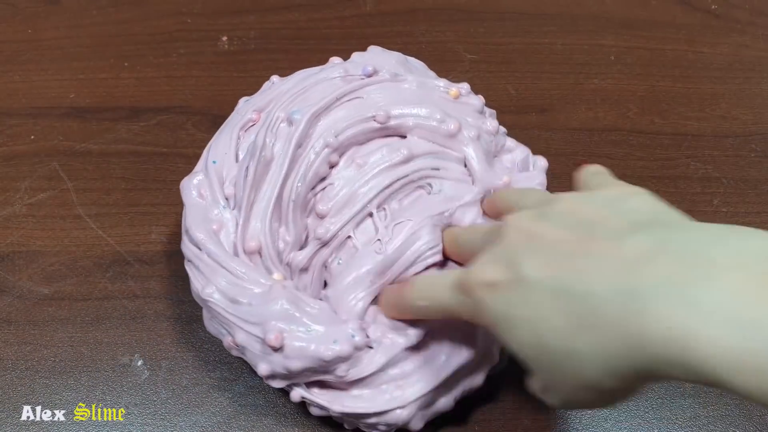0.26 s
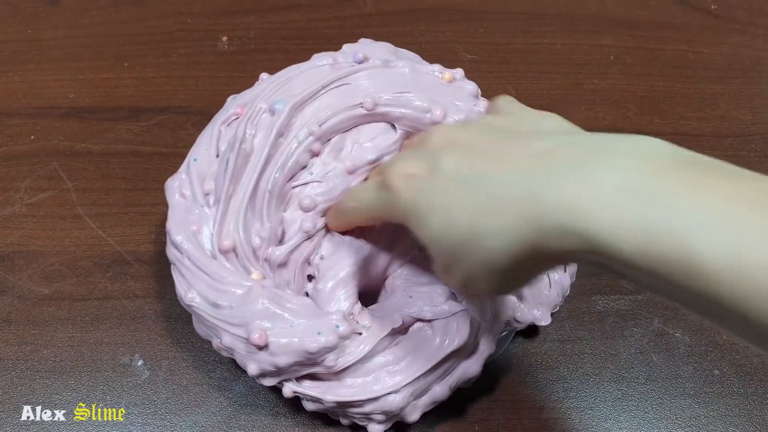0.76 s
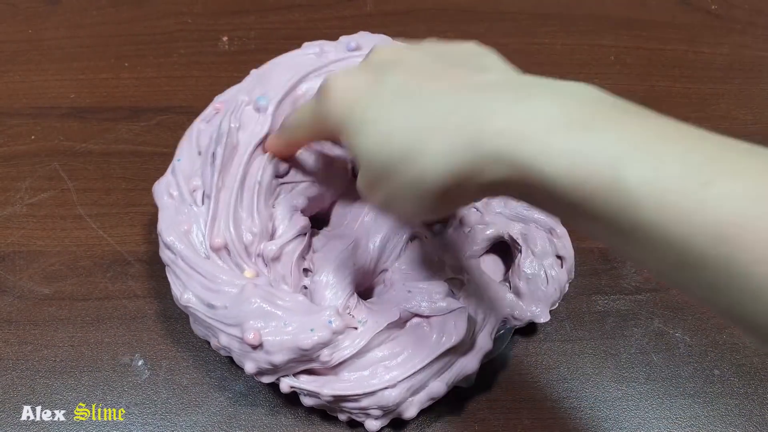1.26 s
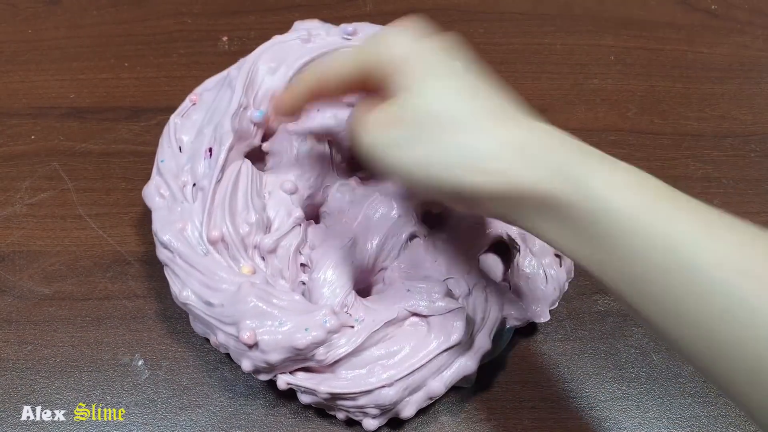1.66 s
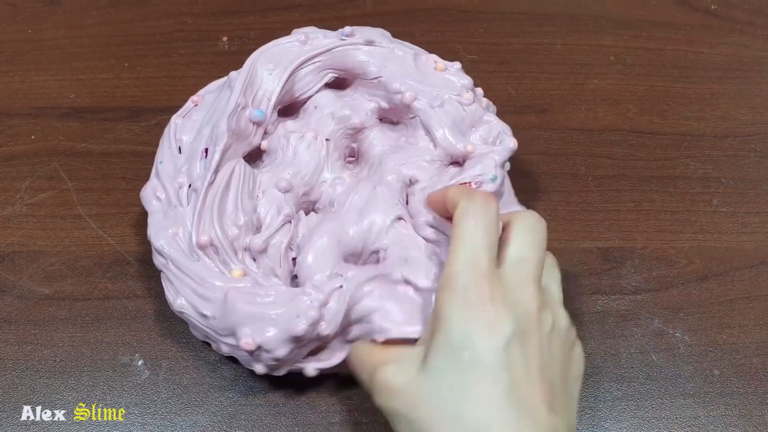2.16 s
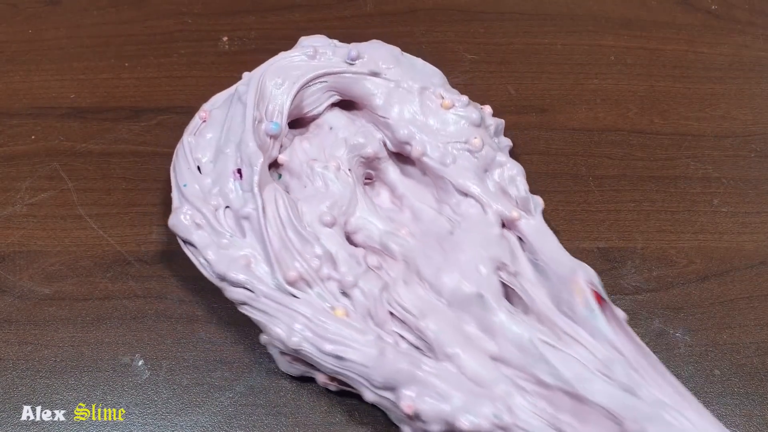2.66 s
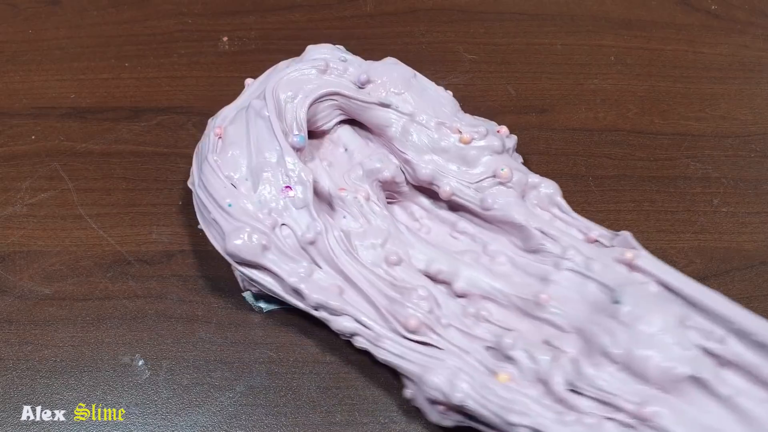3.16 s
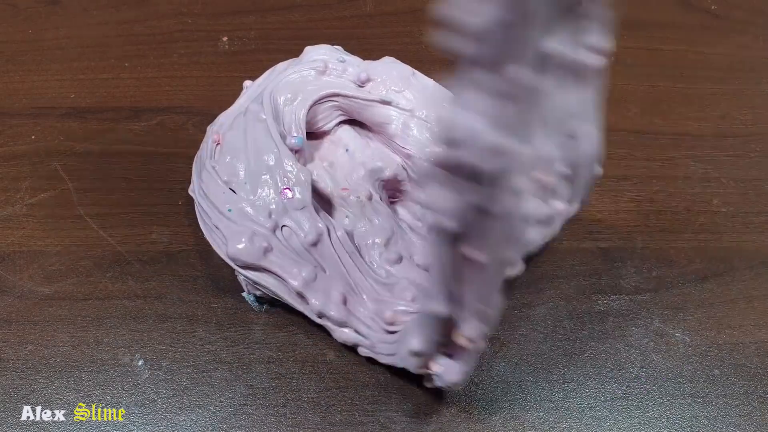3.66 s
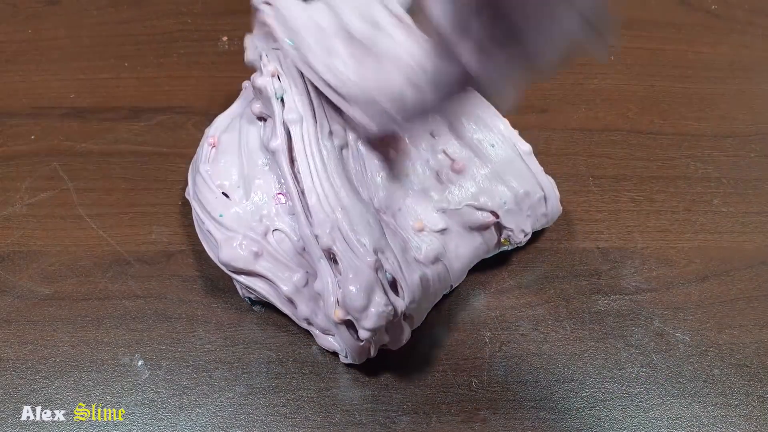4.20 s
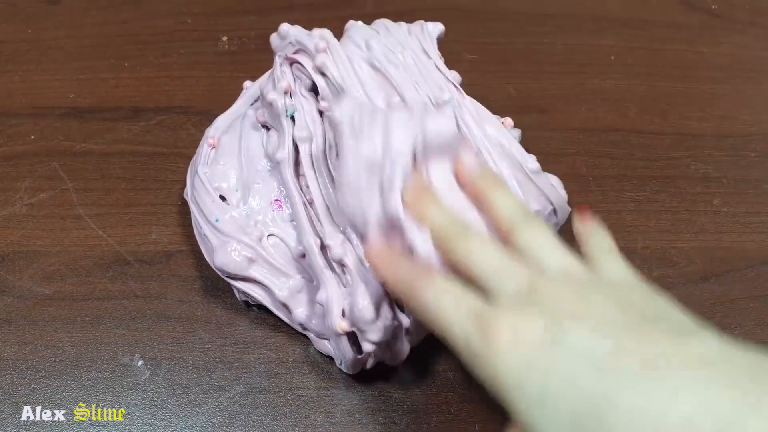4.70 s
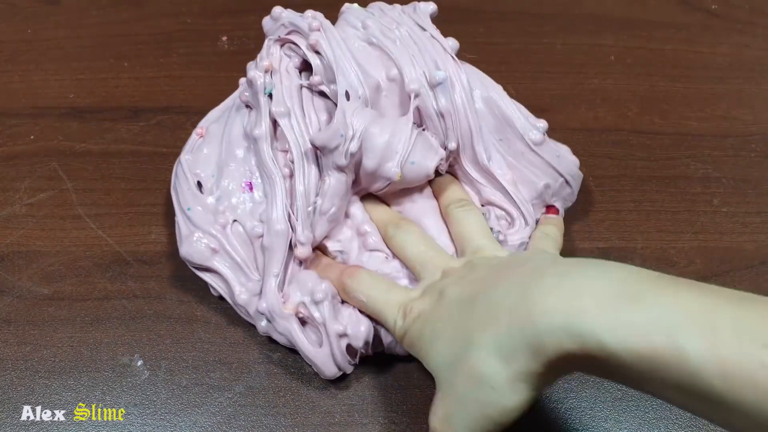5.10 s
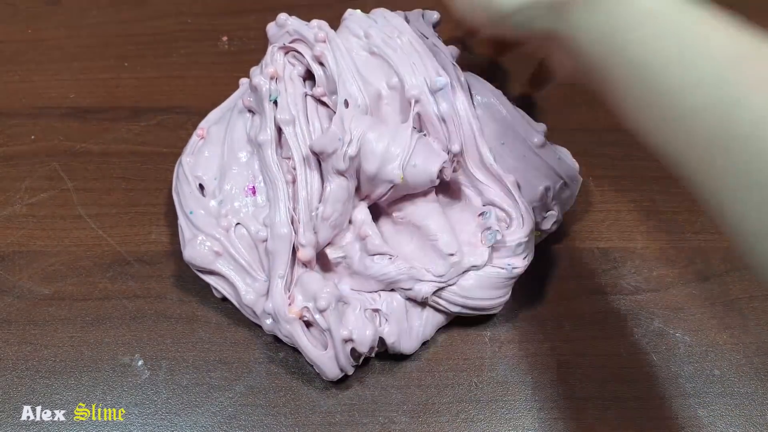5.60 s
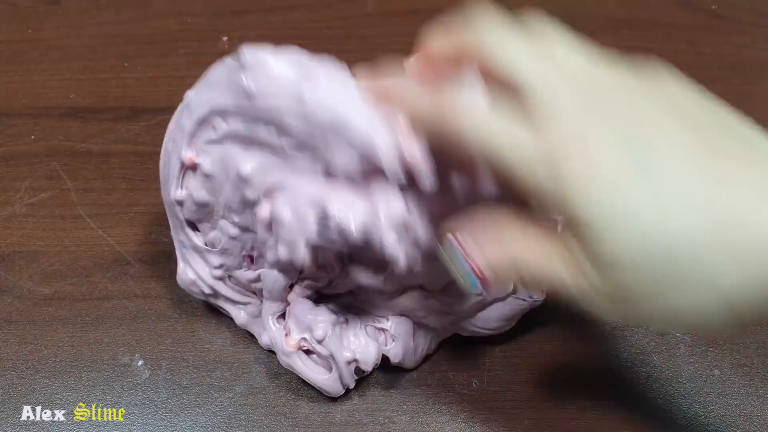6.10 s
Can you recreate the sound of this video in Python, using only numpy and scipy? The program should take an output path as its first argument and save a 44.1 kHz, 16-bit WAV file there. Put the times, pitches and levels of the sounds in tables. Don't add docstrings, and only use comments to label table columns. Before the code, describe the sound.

Very close stereo microphone in a small quiet room. A hand pokes thick, sticky slime on a wooden table: separate wet squelches with sharp air-pocket pops and fine crackle. Peeling brings a quick run of snaps and hollow bubbles, then a long stretch falls nearly silent with faint ticks. A tiny rising squeak precedes renewed folding, pressing pops and soft table thuds. Low machine hum and faint hiss remain underneath.

```python
import sys
import numpy as np
from scipy import signal
from scipy.fft import rfft, irfft, next_fast_len
from scipy.io import wavfile
from scipy.ndimage import uniform_filter1d

SR = 44100
rng = np.random.default_rng(int(sys.argv[2]) if len(sys.argv) > 2 else 0)


def field_ratio(decibels):
    return 10 ** (np.asarray(decibels, dtype=float) / 20)


def generate_wav(signal):
    frames = np.transpose(np.atleast_2d(signal))
    scaled = np.clip(frames, -1, 1) * 32767
    pcm = np.round(scaled).astype(np.int16)
    wavfile.write(sys.argv[1], SR, pcm)


N = 279900

# [t/s, left-right level of crackle/dB, left-right level of clear bursts/dB]
PLACE = [(0, 7, 12), (1.9, 13.5, 6), (2.5, 14.5, 7.5), (3, 8, 0), (3.16, -17, -18.5), (3.42, -9, -14),
         (3.66, 7.5, 10), (4.9, 10, 7.5), (6.35, 15.5, 5.5)]


def pocket_pops():
    # [t/s, peak level/dB, pocket f/Hz, length/cycles]
    poke = [(0.1315, -43, 2100, 0.58), (0.1317, -30, 6950, 0.8), (0.3104, -37, 5740, 0.52),
            (0.3516, -34, 9400, 0.75), (0.3731, -44.5, 5900, 1.2), (0.4324, -44, 9050, 0.63),
            (0.572, -38, 640, 0.93), (0.5824, -26, 12200, 2.7), (0.6055, -26, 2430, 0.62),
            (0.6056, -14.5, 6000, 0.4), (0.6117, -31.5, 300, 1.5), (0.7443, -39, 2520, 1.7),
            (0.7444, -20.5, 8200, 1.33), (0.8755, -29, 7000, 0.9), (0.9218, -34, 9000, 1.4),
            (1.1294, -26.5, 11200, 0.84), (1.1334, -35.5, 2130, 0.4), (1.1483, -26, 6300, 1.7),
            (1.1484, -11.5, 2190, 0.89), (1.1562, -28.5, 330, 1.1), (1.1749, -30, 8140, 3.6),
            (1.3714, -46.5, 7100, 1.3), (1.4485, -38, 6740, 1.3), (1.4485, -33, 1670, 0.48),
            (1.4275, -51, 1250, 3), (1.527, -47, 1300, 2.2), (1.608, -53, 1270, 5.1),
            (1.6192, -48.5, 1350, 1.8), (1.627, -50, 1280, 2.7), (1.6817, -33.5, 510, 1.3),
            (1.667, -38, 475, 1.1), (1.5945, -55, 4100, 2), (1.562, -48.5, 1490, 1.2)]
    peel_stretch = [(2.0323, -35, 12500, 0.93), (2.0699, -37, 900, 0.47), (2.0696, -35, 5600, 1.6),
                    (2.0833, -26, 6900, 0.8), (2.133, -34, 9900, 0.37), (2.1598, -40, 1500, 1.4),
                    (2.162, -32, 1140, 3), (2.1769, -38, 11900, 3), (2.211, -41.5, 520, 1.4), (2.205, -44, 1600, 2),
                    (2.098, -49, 1220, 2), (2.341, -43, 1800, 1.2), (2.214, -32, 11700, 2.1),
                    (2.2418, -33, 1590, 0.93), (2.2668, -38.5, 1670, 1.6), (2.287, -42, 1820, 1.2),
                    (2.265, -25, 4650, 2.7), (2.3105, -36, 1430, 0.91), (2.3097, -33, 8400, 0.75),
                    (2.3567, -49, 4480, .34), (2.362, -40, 1800, 1.4), (2.4171, -29, 10200, 0.77),
                    (2.427, -28, 1660, 0.17), (2.4256, -32, 5200, 2.2), (2.443, -30, 8940, 0.36),
                    (2.482, -32, 11700, 0.48), (2.5106, -39, 2740, 1.3), (2.5111, -40, 6600, 0.56),
                    (2.5231, -46, 1630, 1.4),
                    (2.5721, -47, 1600, 1), (2.6321, -50.5, 1300, 1.8), (2.6438, -47, 1370, 0.7),
               (2.654, -48, 1130, 1.4), (2.676, -50.5, 1140, 2.7), (2.7017, -52, 2200, 1.6),
               (2.77, -57, 950, 2), (2.6918, -37.5, 10400, 2.7), (2.7298, -52, 1200, 4.3),
               (2.747, -54, 1050, 1.5), (3.085, -58, 2520, 3.2), (2.941, -48.5, 1320, 0.84),
               (2.9513, -41.5, 11300, 1.8), (3.134, -51.5, 10900, 3.5), (3.1692, -41.5, 11200, 4.5),
               (3.272, -49, 11300, 2.3), (3.3753, -45, 11500, 2.5), (3.9204, -48, 13400, 2.1),
               (3.9777, -38.5, 1254, 2.6), (3.991, -47, 1450, 4), (2.692, -58, 3120, 2.9),
               (4.77, -48.5, 2920, 2.1), (4.183, -42.5, 11500, 0.68), (4.2007, -46, 2060, 0.29),
               (4.5665, -25, 10800, 2.2), (4.5681, -43, 1730, 0.66), (4.683, -44, 12800, 3.3),
               (4.768, -47, 8500, 0.33), (4.8587, -33, 10600, 0.69), (4.928, -40, 11500, 0.3)]
    fold = [(5.0381, -33.5, 11600, 2.1), (5.0802, -36, 9500, 1.4), (5.1064, -43, 11000, 1.5),
            (5.1267, -20, 11500, 0.74), (5.1273, -39, 795, 0.26), (5.1274, -27.5, 350, 0.12),
            (5.1713, -28.5, 5330, 0.24), (5.3348, -20.5, 9900, 1.6), (5.3558, -24.5, 5000, 1.6),
            (5.3615, -39, 6540, 0.42), (5.3617, -32, 280, 2.1), (5.665, -37, 6500, 0.45),
            (5.6642, -33.5, 227, 0.84), (5.655, -38.5, 5000, 0.45), (5.7979, -32, 2640, 0.87),
            (5.8544, -42, 6230, 1.3), (5.853, -32, 1570, 0.9), (5.873, -46, 1630, 1.5),
            (5.95, -42, 1250, 1.5), (5.8684, -34.5, 384, 1.8), (6.1797, -39.5, 3280, 0.36),
            (6.165, -55, 1270, 3.5), (6.2264, -33.5, 4800, 2), (6.303, -48, 1380, 1.4),
            (6.317, -37.5, 11400, 2.3)]
    return pops(poke + peel_stretch + fold)


def further_pops():
    # [t/s, peak level/dB, pocket f/Hz, length/cycles]
    poke = [(0.0579, -50, 1760, 2.7), (0.0185, -48, 1300, 2.0), (0.6088, -19, 11800, 4.0),
            (0.3028, -50, 5400, 2.2), (0.3407, -41.5, 5090.0, 4.1), (0.3432, -54, 1150.0, 3.2),
            (0.6102, -28, 3400, 1.2), (0.005, -46, 1500, 2.5), (0.457, -51.5, 8790.0, 3.5),
            (0.5882, -39.0, 1200, 2.0), (0.6016, -36, 3180.0, 1.3), (0.6072, -21, 3500, 1.2),
            (0.6096, -21, 7500, 1.2), (0.6241, -42.5, 2900, 4.7), (0.6251, -38, 11120.0, 5.0),
            (0.7338, -49, 8200, 5.0), (0.8286, -63.5, 1990.0, 2.4), (0.8301, -50, 13000.0, 5.0),
            (0.8755, -36.5, 12000, 4.8), (0.9219, -27.5, 10100, 4.1), (1.1334, -40.5, 4700.0, 1.9),
            (1.1399, -31.5, 12020.0, 4.8), (1.1549, -32.0, 1980, 2.4), (1.1629, -30, 2750, 3.3),
            (1.1693, -32.5, 1550, 1.9), (1.1748, -38.5, 9400, 5.0), (1.1763, -35.0, 2160, 2.6),
            (1.1803, -31.5, 2150.0, 1.7), (1.4168, -55, 1430, 2.3), (1.4657, -48, 6950.0, 2.8),
            (1.6512, -48, 1360, 2.7), (1.6605, -36, 7000, 1.8), (1.6602, -42, 1200, 2.5),
            (1.6672, -41, 2630, 4.0), (1.6907, -38, 2140, 1.7), (1.6996, -39, 1990.0, 1.4),
            (1.7206, -47.0, 1210, 3.0)]
    peel_and_stretch = [(2.0754, -47.5, 1230, 1.7), (2.0748, -41, 9510.0, 3.8), (2.1302, -47, 13000.0, 5.0),
                        (2.134, -39, 1930, 1.9), (2.17, -39, 3160, 2.5), (2.1766, -38, 890, 2.4),
                        (2.209, -42, 4500, 2), (2.2274, -43, 1700.0, 2.2), (2.2414, -39, 4760, 4.1),
                        (2.2604, -46, 4020.0, 3.2), (2.2604, -33, 12020.0, 4.4),
                        (2.3551, -35, 13000.0, 5.0), (2.3551, -34, 5090.0, 2.7), (2.3546, -41.0, 1600, 1.9),
                        (2.3596, -44.5, 580, 1.7), (2.362, -44, 7520.0, 4.2), (2.442, -39, 5800, 2.4),
                        (2.5108, -54, 2920, 2.3), (2.5177, -49, 2940.0, 2.3), (2.6774, -45, 10200, 4.1),
                        (2.7017, -50.5, 1210, 2.3), (2.7303, -55, 2260, 3.6), (2.874, -52.5, 4350.0, 1.2),
                        (2.5385, -54, 1500, 2.0), (3.1494, -51.0, 11900, 3.9), (3.2007, -49, 11120.0, 4.4),
                        (2.5075, -50, 1700, 1.7), (2.5155, -51, 1300, 1.7), (3.6643, -43.5, 6760, 2.8),
                        (2.6085, -56, 1200, 2.5), (3.977, -52, 3180.0, 3.3), (2.5515, -54, 1400, 2.0),
                        (4.2003, -51, 7520.0, 3.5), (4.5597, -44.5, 9510.0, 5.0),
                        (4.6345, -54, 3720.0, 1.6), (4.8106, -43, 5950.0, 2.4), (4.8879, -48, 6550, 2.8)]
    fold = [(5.1345, -44, 2940.0, 2.1), (5.1368, -43, 11120.0, 4.4), (5.139, -43, 3440.0, 2.9),
            (5.3303, -39, 5500.0, 2.8), (5.3537, -26.5, 7660, 3), (5.3526, -43, 1250, 2.5),
            (5.363, -37.0, 8130.0, 3.2), (5.3757, -38, 3640, 3.3), (5.667, -47, 1640, 2.7),
            (5.6968, -44, 1340, 2.7), (5.7165, -37, 4640, 2.2), (5.7624, -40, 3720.0, 1.7),
            (5.7625, -46, 1200, 3.6), (5.8367, -48, 448, 2.3), (5.8657, -40, 3350, 3.2),
            (5.8677, -41, 450.0, 2.2), (5.8991, -46, 13000.0, 5.0), (6.0956, -44, 5700, 2.9),
            (6.268, -47, 11000, 4.5), (6.0996, -47, 3440.0, 2.4), (6.1488, -42, 6950.0, 2.8),
            (6.333, -46, 11000, 2.5), (6.226, -38, 12700, 3.7), (6.304, -38, 10280.0, 4.1),
            (6.3401, -50.0, 9510.0, 3.8)]
    return pops(poke + peel_and_stretch + fold)


def pops(bursts):
    scatter_db = 3
    out = np.zeros((2, N))
    t = np.arange(-300, 900) / SR
    draws = rng.standard_normal((len(bursts), 3, len(t)))
    slow_spatter = field_ratio(-23.5 - 60 * abs(t) / np.where(t < 0, 0.009, 0.014))
    spatter = slow_spatter + field_ratio(-17 - 60 * abs(t) / 0.0034)
    place_db = curves(PLACE)[1]
    for (s, db, hz, cycles), noise in zip(bursts, draws):
        pan_db = place_db[round(s * SR)] + scatter_db * noise[0, 1]
        for side, sign in enumerate((1, -1)):
            u = (t + sign * 6e-6 * pan_db) * hz
            rise = 2 ** -(u / (0.4 * cycles)) ** 2
            decay = 2 ** -abs(u / (0.6 * cycles)) ** 1.4
            turns = u + 0.0033 * u * abs(u) / cycles + 0.2 * noise[0, 0]
            wave = np.where(u < 0, rise, decay) * np.cos(2 * np.pi * turns)
            snap = field_ratio(-11.5) * np.sinc(0.75 * SR * u / hz) * 2 ** -(u / hz / 3e-4) ** 2
            torn = resonate(noise[0] + noise[1 + side], hz, 0.65 * hz)
            torn = resonate(torn, hz, 0.62 * hz) * spatter
            highpass = signal.butter(2, 0.25 * hz, "high", fs=SR, output="sos")
            burst = signal.sosfilt(highpass, wave + torn + snap)
            add(out[side], s + t[0], field_ratio(db + sign * pan_db / 2) * burst)
    return out


def squelch():
    # [f/Hz, level/dB]
    fizz_spectrum = [(2500, -1.5), (3500, -3.5), (4500, -2), (7500, -3.5), (12000, 0.5), (15500, -6),
                     (16200, -40.5)]
    # [f/Hz, width/Hz, level/dB]
    table_modes = [(114, 43.8, -10), (195, 37, 5), (280, 28, -3), (306.5, 15, 4.5), (377, 160, 12.5),
                   (543, 38, -10), (680, 300, -10)]
    fizz_db, pocket_db, push_db, hole_hz = hand()
    clumps_db = uniform_filter1d(uniform_filter1d(rng.standard_normal(N), 200), 200)
    clumps_db = 0.94 * evened(clumps_db)
    ports = field_ratio(pan(0.5) * curves(PLACE)[0])

    own_clicks = np.array([crackle(4500, 4.77), crackle(4500, 4.86)])
    fizz = colour(crackle(3500, 4.4) + 1.8 * own_clicks, fizz_spectrum)
    fizz = patchy(fizz, depth_db=2)
    fuller = signal.sosfiltfilt(signal.butter(2, 6500, fs=SR, output="sos"), fizz)
    light_db = np.clip(0.6 * (pocket_db - fizz_db), -17, 3)
    fizz = (fizz + (field_ratio(light_db) - 1) * fuller) * field_ratio(fizz_db + clumps_db)
    larger = pockets(hole_hz) * field_ratio(pocket_db + clumps_db - 9)

    pushes = crackle(400, 3.2) * field_ratio(push_db)
    top = sum(field_ratio(db) * resonate(pushes, hz, width) for hz, width, db in table_modes)
    top = signal.sosfilt(signal.butter(2, 1100, fs=SR, output="sos"), top)
    top = evened(top) * np.sqrt(np.mean(field_ratio(push_db - 5.5) ** 2))
    return fizz * ports ** 0.5 + larger * ports + top * field_ratio(pan(2.2))


def hand():
    # [t/s, hold/s, fizz/dB, push re fizz/dB, finger hole f/Hz]
    squeezes = [(0.579, 0.034, -42, -2.5, 1670), (1.137, 0.03, -42.5, 2.5, 1990),
                (1.656, 0.029, -43.5, -1.5, 1675), (2.159, 0.017, -50, -16, 1270),
                (2.203, 0.022, -48.5, -5, 1667), (2.356, 0.0053, -46, -7, 1698),
                (5.134, 0.037, -57.5, -8.5, 2610), (5.337, 0.041, -45.5, 0.5, 2940),
                (5.668, 0.012, -52, 8.5, 1240), (5.719, 0.018, -44.5, -20.5, 2896),
                (5.85, 0.055, -47.5, 0.5, 1590), (5.924, 0.039, -53, 3.5, 1348),
                (6.093, 0.0036, -53, -7, 2100)]
    # [t/s, hold/s, fizz/dB]
    tears = [(0, 0.066, -57), (0.15, 0.24, -68), (0.316, 0.11, -61.5), (0.78, 0.061, -62),
             (0.906, 0.044, -62), (1.367, 0.13, -65), (2.07, 0.08, -49), (2.276, 0.026, -51),
             (2.4, 0.12, -56), (2.585, 0.29, -69.5), (2.94, .06, -69), (3.09, .2, -68), (3.358, 0.069, -64),
             (3.444, 0.13, -73), (3.641, 0.063, -66), (3.746, 0.036, -58.5), (4.184, 0.016, -66.5),
             (4.561, 0.12, -59.5), (4.76, 0.19, -67), (4.989, 0.17, -67), (5.103, .02, -62.5),
             (5.421, 0.039, -72), (5.777, 0.041, -55.5), (5.983, 0.085, -56), (6.109, 0.13, -61),
             (6.266, 0.061, -61)]
    # [t/s, hold/s, level/dB, finger hole f/Hz]
    sucks = [(0, 0.016, -48, 1640), (0.332, 0.042, -61, 1154), (1.447, 0.08, -60, 1710),
             (1.611, 0.024, -71.5, 1355), (2.506, 0.04, -61, 1930), (2.585, 0.03, -63.5, 1730),
             (2.627, .14, -64.5, 1800), (2.952, 0.011, -68, 1270), (3.985, .03, -57, 1452),
             (4.171, 0.0089, -77.5, 1760), (4.546, 0.018, -71.5, 1644), (4.795, .05, -67, 1580),
             (5.753, .04, -50.5, 1460), (6.128, 0.11, -75.5, 1570)]
    # [larger pockets/dB, push/dB]
    tear_db = [-13.5, -17]
    # [fizz/dB, push/dB]
    suck_db = [-51.5, -13]
    # [fizz/dB, larger pockets/dB, push/dB]
    rest_db = [-87, -107, -84]
    # [fizz/(dB/s), larger pockets/(dB/s), push/(dB/s)]
    fall_db_per_s = [264, 346.5, 178]
    rise_db_per_s = 948

    moves = [(s, hold, db, db, db + push_db, hz) for s, hold, db, push_db, hz in squeezes]
    moves += [(s, hold, db, db + tear_db[0], db + tear_db[1], 1600) for s, hold, db in tears]
    moves += [(s, hold, db + suck_db[0], db, db + suck_db[1], hz) for s, hold, db, hz in sucks]
    s, hold, *levels, hz = np.array(moves).T[:, :, None]
    t = np.arange(0, N / SR, 0.002)
    early = np.maximum(s - t, 0)
    late = np.maximum(t - s - hold, 0)
    powers = [field_ratio(db - rise_db_per_s * early - fall * late) ** 2 for db, fall in zip(levels, fall_db_per_s)]
    sums_db = [10 * np.log10(p.sum(0) + field_ratio(rest) ** 2) for p, rest in zip(powers, rest_db)]
    hole_hz = (powers[1] * hz).sum(0) / powers[1].sum(0)
    return curves(np.transpose([t, *sums_db, hole_hz]))


def pockets(hole_hz):
    out = np.zeros((2, N))
    # (pitch re hole, level/dB, width/Hz)
    for ratio, db, width in [(0.55, -8, 280), (0.8, -1, 380), (1, 0, 440), (1.3, -3, 560), (1.9, -6, 800)]:
        bursts = crackle(280, 3.5) + 0.55 * np.array([crackle(280, 3), crackle(280, 3)])
        ring = glide(bursts, ratio * hole_hz, width)
        out += field_ratio(db) * evened(glide(ring, ratio * hole_hz, 8.1 * width))
    return evened(out)


def hollows():
    # [t/s, hold/s, level/dB, hole f/Hz, t60/s]
    holes = [
        (1.445, 0.1, -61, 1650, 0.21),
        (1.44, .1, -68, 430, .2),
        (1.612, 0.059, -59.5, 1320, .08),
        (2.154, 0.0094, -40.5, 1280, 0.065),
        (3.98, 0.02, -64.5, 1320, 0.27),
        (5.855, .008, -52, 1360, 0.15),
    ]
    width_hz = 480
    t = np.arange(12000) / SR
    out = np.zeros(N)
    spit = crackle(900, 2.4)
    for s, hold, db, hz, t60 in holes:
        part = spit[round(s * SR):][:len(t)]
        tone = resonate(resonate(part, hz, width_hz), hz, 3.4 * width_hz)
        decay = field_ratio(db - 60 * np.maximum(t - hold, 0) / t60)
        add(out, s, tone * np.minimum(t / 0.0018, 1) * decay)
    return out * field_ratio(pan(1.8))


def squeak():
    # [t/s, f/Hz, level/dB]
    glissando = [
        (4.778, 1290, -75),
        (4.81, 1342, -57.5),
        (4.83, 1396, -67),
        (4.855, 1504, -57.5),
        (4.885, 1620, -88),
    ]
    hz, db = curves(glissando)
    start_s, end_s = glissando[0][0], glissando[-1][0]
    t = np.arange(N) / SR
    on = np.interp(t, [start_s, start_s + 0.0097, end_s - 0.015, end_s], [0, 1, 1, 0])
    waver = 0.13 * uniform_filter1d(rng.standard_normal(N), 200)
    phase = 2 * np.pi * np.cumsum(hz * (1 + waver)) / SR
    whistle = on * field_ratio(db) * (np.sin(phase) + 0.14 * np.sin(2 * phase))
    return whistle * field_ratio(pan(2))


def slap():
    knocks_s = [5.36, 5.661, 5.745]
    # [level/dB, f/Hz, t60/s]
    swings = [
        (-41.5, 195, 0.41),
        (-34.5, 109, 0.15),
        (-35, 200, 0.14),
    ]
    t = np.arange(20000) / SR
    out = np.zeros(N)
    for s, (db, hz, t60) in zip(knocks_s, swings):
        add(out, s, field_ratio(db - 60 * t / t60) * np.sin(2 * np.pi * hz * t))
    return out * field_ratio(pan(1))


def room(x):
    # [f/Hz, t60/s]
    decay = [(150, 0.63), (400, 0.33), (750, .42), (1400, 0.3), (4500, 0.29), (12000, 0.29)]
    wall_s, wall_db = 0.0106, -10
    taps = np.zeros((2, SR // 2))
    at = np.arange(130, SR // 2 - 20, 20)
    at = at + rng.integers(0, 20, (2, len(at)))
    np.put_along_axis(taps, at, rng.choice([-1., 1.], at.shape), 1)
    hz, t, z = signal.stft(taps, SR, nperseg=256)
    tail = signal.istft(z * field_ratio(-60 * t / read(decay, hz)[:, None]), SR, nperseg=256)[1]
    highpass = signal.butter(2, 600, "high", fs=SR, output="sos")
    apart = signal.sosfilt(highpass, tail[0] - tail[1])
    tail = np.array([tail[0], 0.7 * (tail[0] - apart)])
    tail[:, round(wall_s * SR)] += field_ratio(wall_db) * np.linalg.norm(tail[0])
    return signal.fftconvolve(x.mean(0)[None], tail / np.linalg.norm(tail[0]), axes=1)[:, :N]


def hum():
    # [t/s, level/dB]
    swell = [(0, -59.5), (.15, -65), (.55, -64), (.85, -78), (1.2, -58.5), (1.55, -62), (2.4, -73),
             (2.78, -74), (3.05, -82), (3.3, -72), (4.08, -79), (4.3, -59), (4.8, -64.5), (5.05, -48.5),
             (5.5, -49), (5.62, -52.5), (5.85, -47), (6.02, -54), (6.17, -47), (6.35, -50)]
    # [f/Hz, width/Hz, level/dB, drift/(dB/s)]
    steady = [(45.3, 1.9, -69.5, -1.6), (107.4, 3.5, -77, 1.5), (156.2, 2.9, -74.5, -1.5),
              (252, 3, -88.5, .1)]
    swell_db = curves(swell)[0]
    modes = [(64.2, 4.37, swell_db), (122, 30, swell_db - 19)]
    modes += [(hz, width, db + drift * np.arange(N) / SR) for hz, width, db, drift in steady]
    mid = sum(field_ratio(db) * fuzzy_line(hz, width) for hz, width, db in modes)
    side = sum(field_ratio(db - 23) * fuzzy_line(hz, width) for hz, width, db in modes)
    return np.array([1.2 * mid + side, 0.82 * mid - side])


def fuzzy_line(hz, width):
    x = resonate(resonate(rng.standard_normal(N), hz, width), hz, 3 * width)
    return evened(x / (uniform_filter1d(x ** 2, size=6000) + 0.023) ** 0.38)


def floor():
    # [f/Hz, level/dB]
    spectrum = [(25, -25.5), (45, -19), (200, -28.5), (650, -36), (1500, -39.5), (5000, -46), (9000, -45.5),
                (13000, -43.5)]
    # [f/Hz, left-right likeness/1]
    likeness = [(60, 0.77), (240, 0.5), (950, 0.1), (3770, -0.1), (15000, -0.11)]
    rms_db = -72
    hz = np.fft.rfftfreq(N, 1 / SR)
    a, b = rfft(rng.standard_normal((2, N)))
    same = np.clip(read(likeness, hz), -1, 1)
    z = np.array([a, same * a + np.sqrt(1 - same ** 2) * b]) * field_ratio(read(spectrum, hz))
    level = np.sqrt(np.mean(irfft(z * (hz > 130), N) ** 2))
    return field_ratio(rms_db) * irfft(z, N) / level * field_ratio(pan(1.2))


def crackle(per_s, spread_db):
    size = field_ratio(spread_db * np.minimum(rng.exponential(1, N), 4))
    return size * rng.choice([-1., 1.], N) * (rng.random(N) < per_s / SR)


def patchy(x, depth_db):
    z = signal.stft(x, nperseg=256)[2]
    field = rng.standard_normal(z.shape[1:])
    field = uniform_filter1d(uniform_filter1d(field, size=9, axis=0), size=14, axis=1)
    return evened(signal.istft(z * field_ratio(depth_db * evened(field)), nperseg=256)[1][:, :N])


def resonate(x, hz, width):
    r = np.exp(-np.pi * width / SR)
    return evened(signal.lfilter([1, 0, -1], [1, -2 * r * np.cos(2 * np.pi * hz / SR), r * r], x))


def glide(x, hz, width):
    turn = np.exp(2j * np.pi * np.cumsum(hz) / SR)
    r = np.exp(-np.pi * width / SR)
    return (turn * signal.lfilter([1 - r], [1, -r], x / turn)).real


def colour(x, points):
    size = next_fast_len(N)
    gain = field_ratio(read(points, np.fft.rfftfreq(size, 1 / SR)))
    return evened(irfft(rfft(x, size) * gain, size)[..., :N])


def evened(x):
    return x / np.sqrt(np.mean(x ** 2) + 1e-20)


def read(points, hz):
    f, value = np.transpose(points)
    return np.interp(np.log(hz + 1), np.log(f + 1), value)


def curves(rows):
    s, *columns = np.transpose(rows)
    return [np.interp(np.arange(N) / SR, s, c) for c in columns]


def pan(db):
    return np.array([[db], [-db]])


def add(mix, s, sound):
    part = mix[round(s * SR):][:len(sound)]
    part += sound[:len(part)]


def scene():
    bursts = pocket_pops() + further_pops() + squeak() + slap()
    near = bursts + squelch() + hollows()
    return near + room(field_ratio(-8) * near) + hum() + floor()


def band_limit(x):
    return signal.sosfilt(signal.butter(12, 16660, fs=SR, output="sos"), x)


def record(dry):
    # [f/Hz, width/Hz, level/dB]
    port_modes = [(3860, 2700, 0), (9250, 1000, -6), (11500, 2000, -.4)]
    treble_right_db, treble_hz = 6, 8500
    size = next_fast_len(N)
    hz = np.fft.rfftfreq(size, 1 / SR)
    port_db = sum(db / (1 + ((hz - f) / (width / 2)) ** 2) for f, width, db in port_modes)
    port_db = port_db + pan(-0.5) * treble_right_db / (1 + (treble_hz / (hz + 1)) ** 4)
    port_db = port_db - 14 * np.clip((hz - 15850) / 200, 0, 1)
    heard = irfft(rfft(dry, size) * field_ratio(port_db), size)[:, :N]
    heard = signal.sosfilt(signal.butter(4, 38, "high", fs=SR, output="sos"), heard)
    lowpass = signal.firwin(511, 16450, window=("kaiser", 9), fs=SR)
    return band_limit(signal.oaconvolve(heard, lowpass[None], "same"))


dry = scene()
out = record(dry)
generate_wav(out)
```